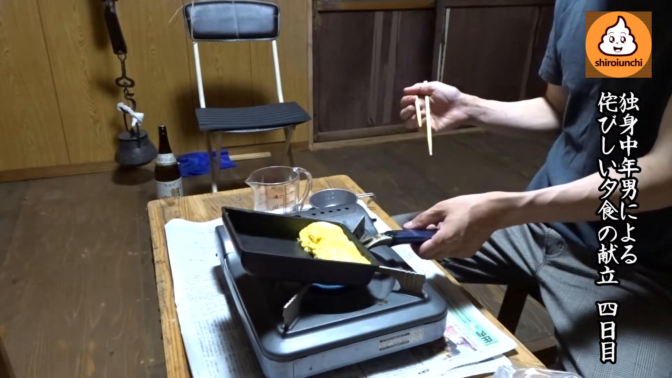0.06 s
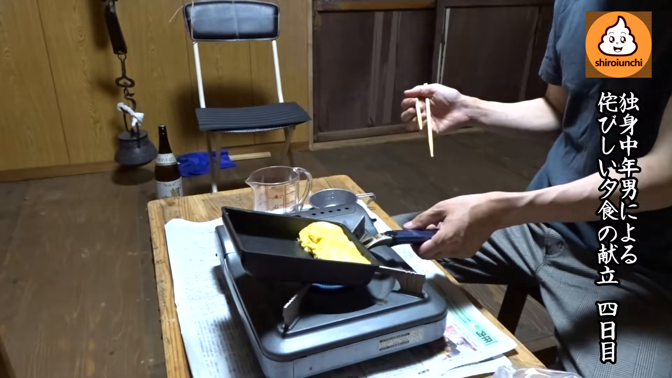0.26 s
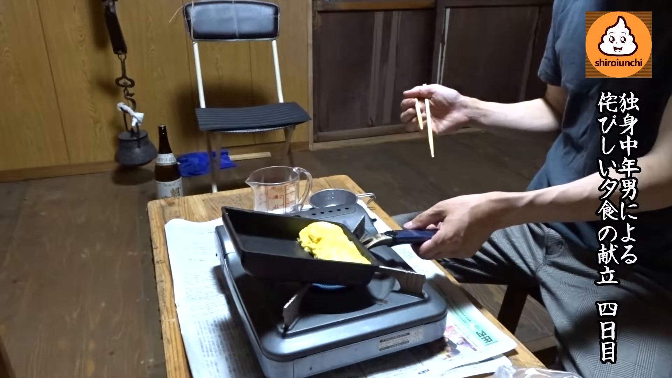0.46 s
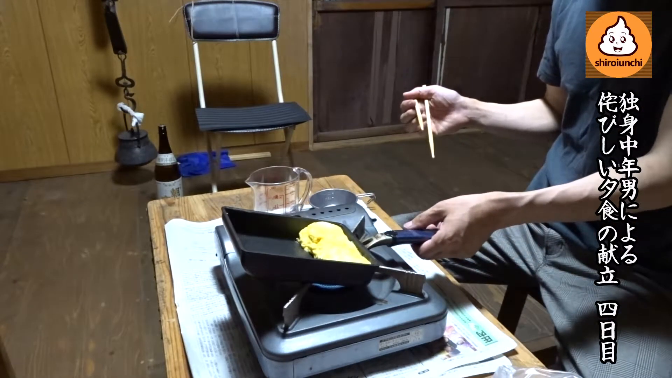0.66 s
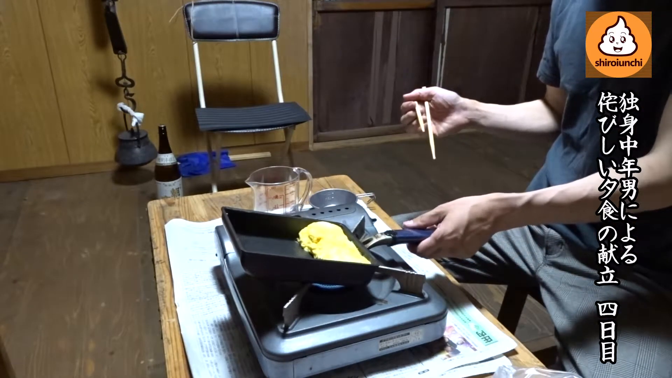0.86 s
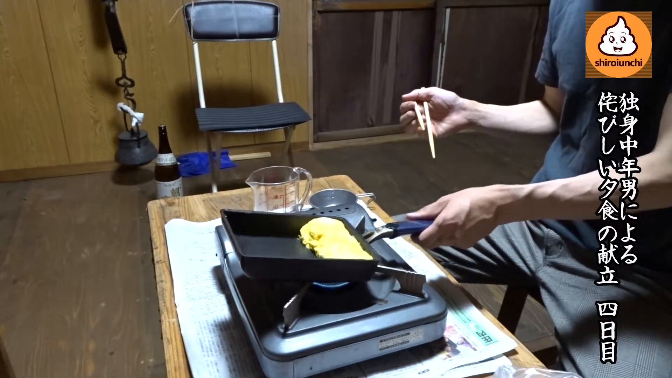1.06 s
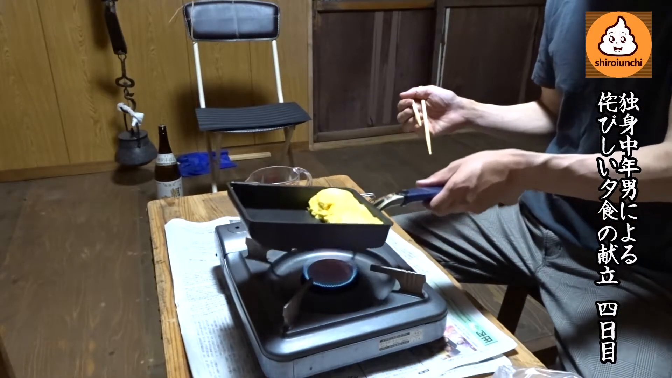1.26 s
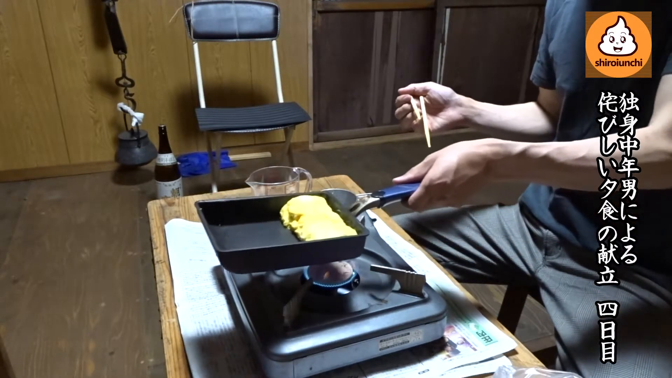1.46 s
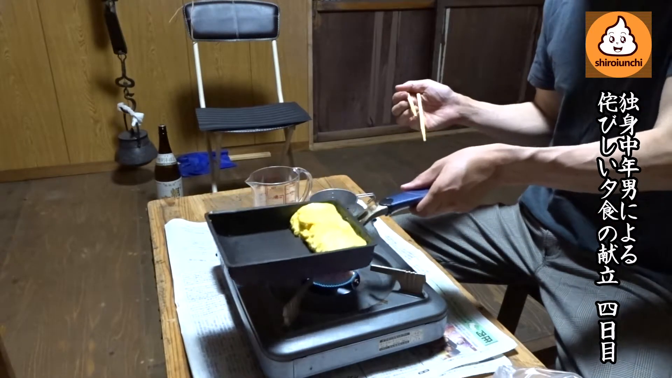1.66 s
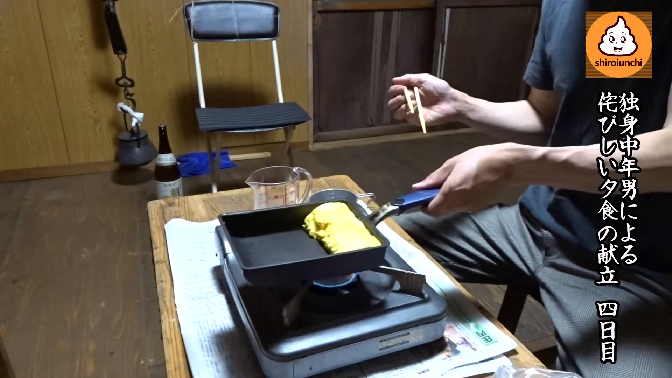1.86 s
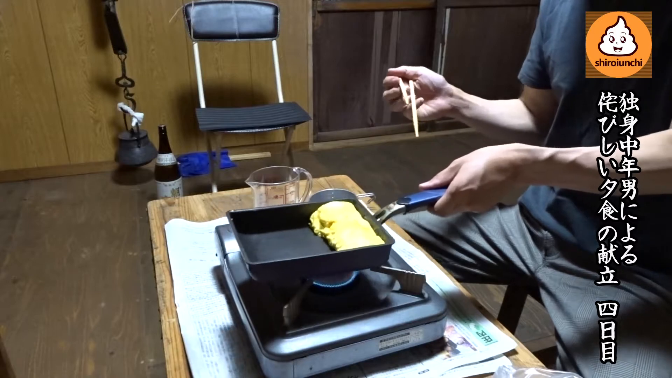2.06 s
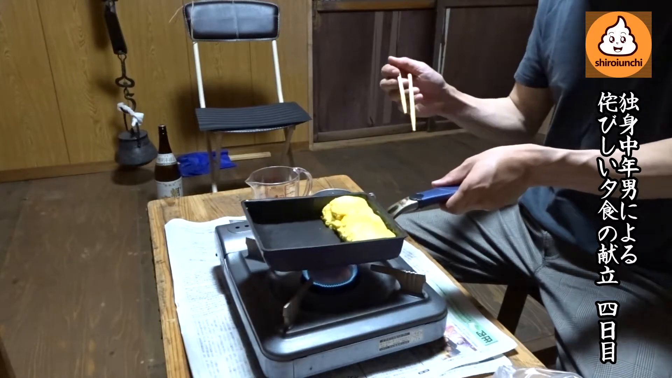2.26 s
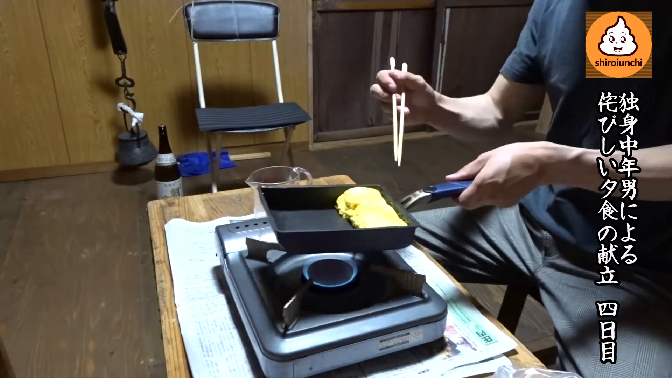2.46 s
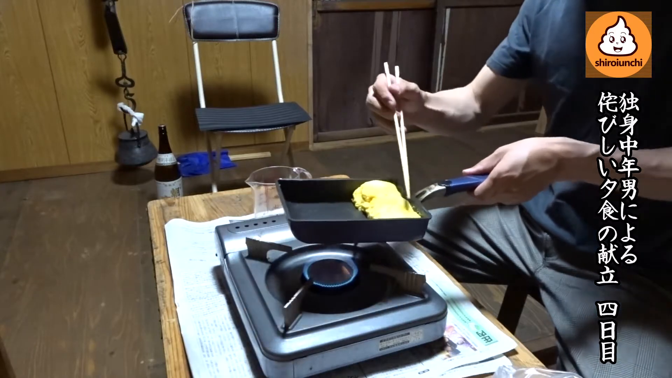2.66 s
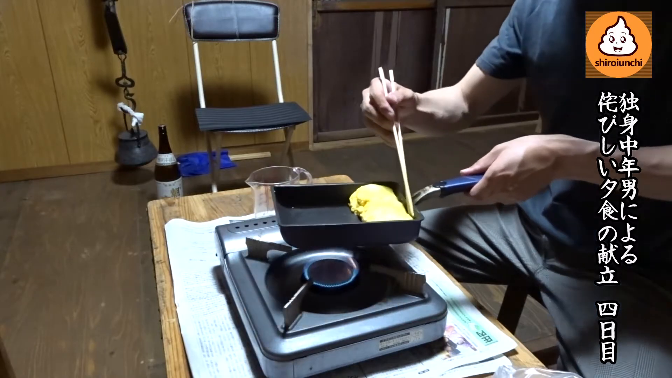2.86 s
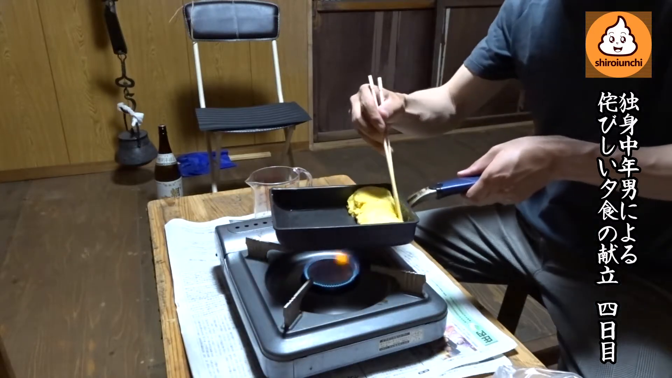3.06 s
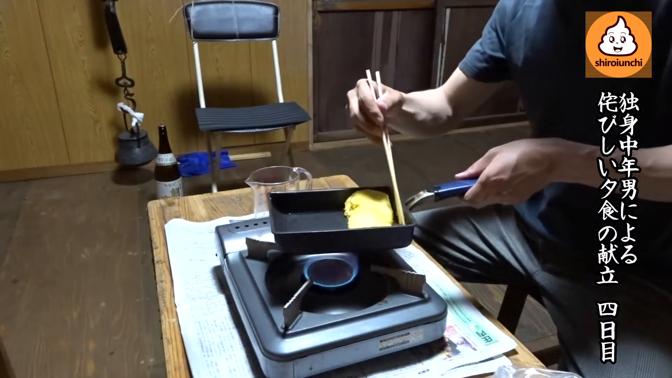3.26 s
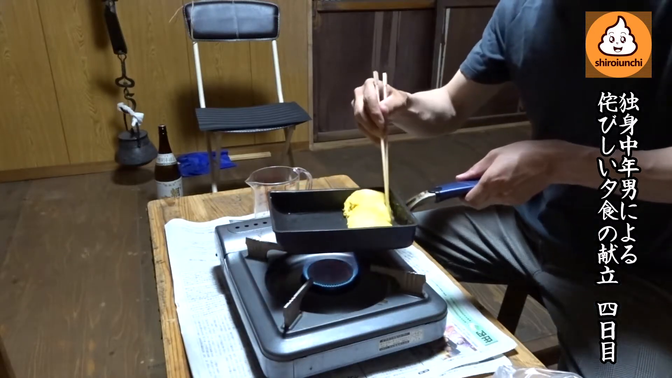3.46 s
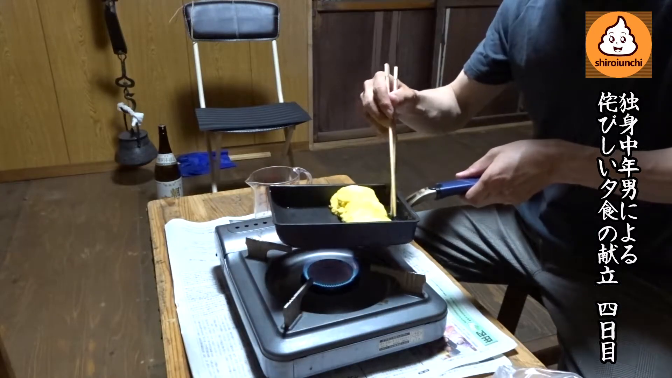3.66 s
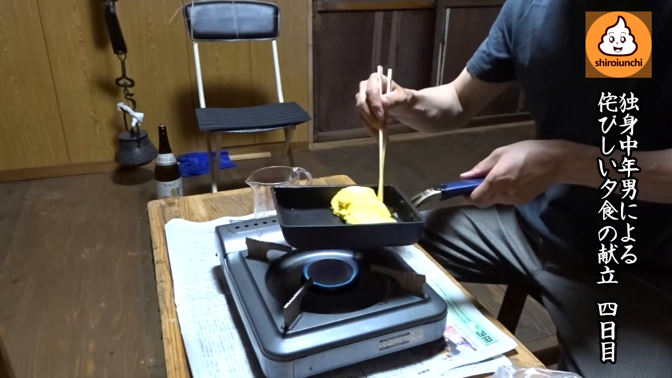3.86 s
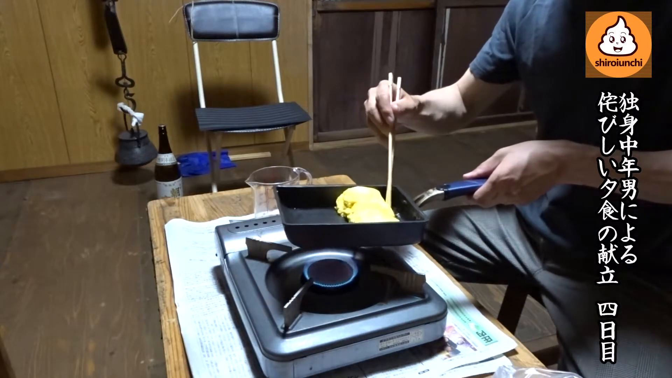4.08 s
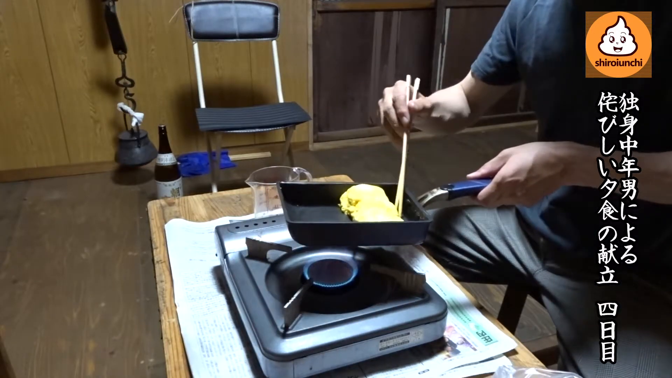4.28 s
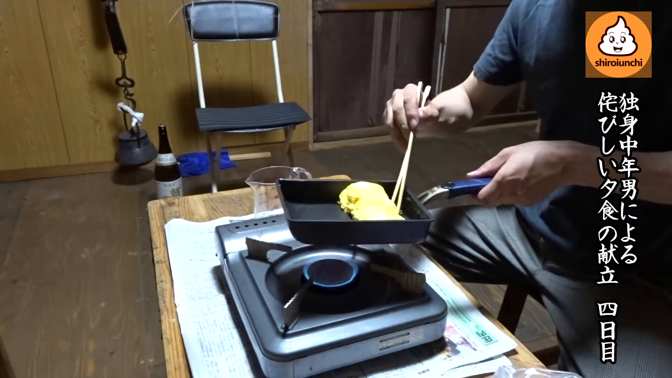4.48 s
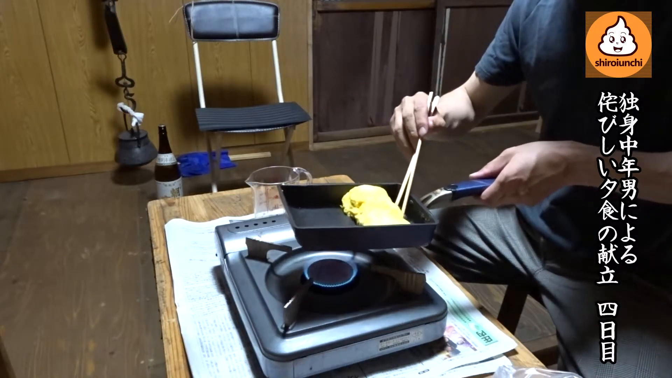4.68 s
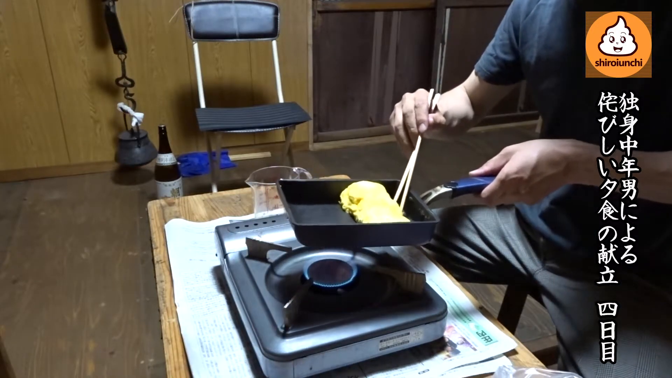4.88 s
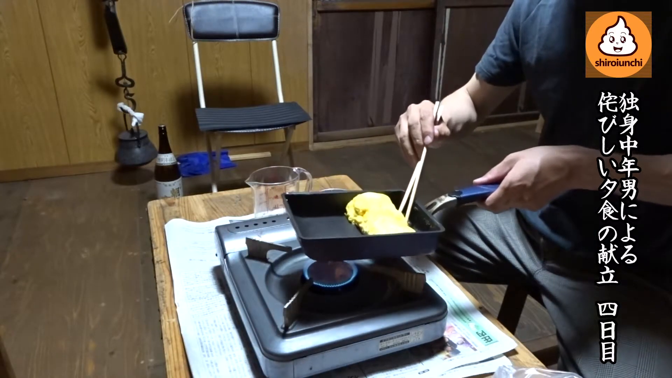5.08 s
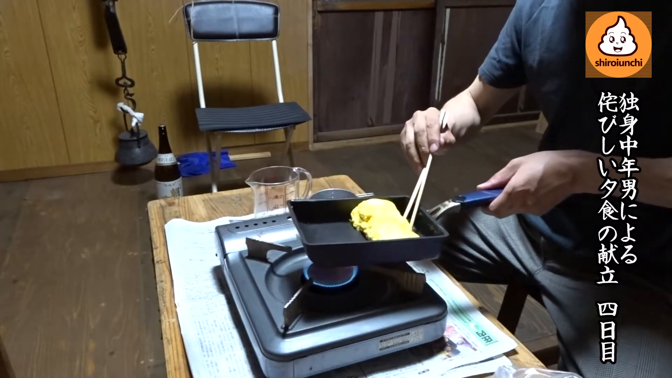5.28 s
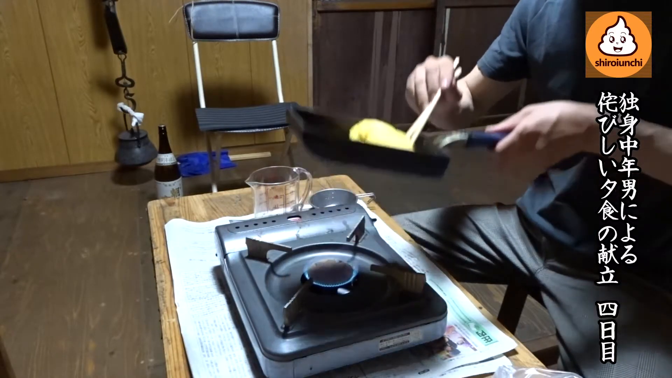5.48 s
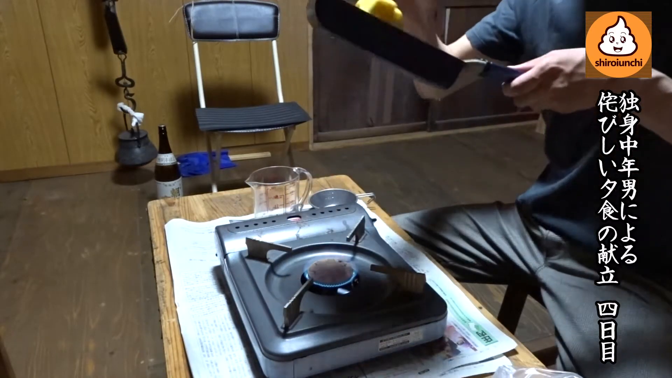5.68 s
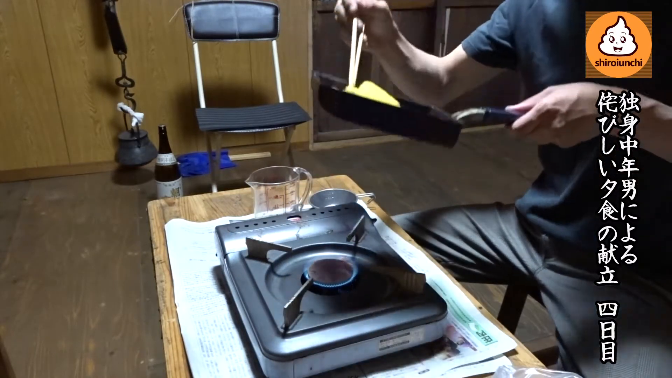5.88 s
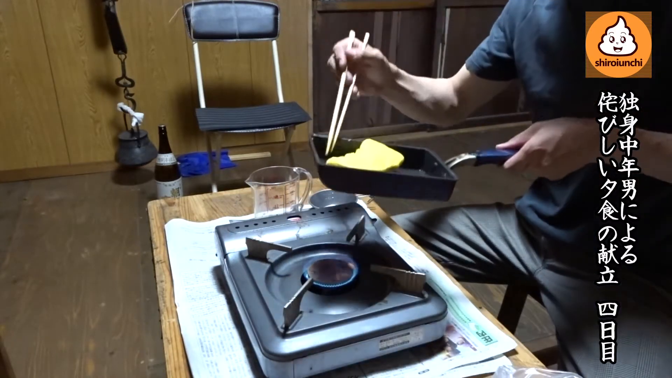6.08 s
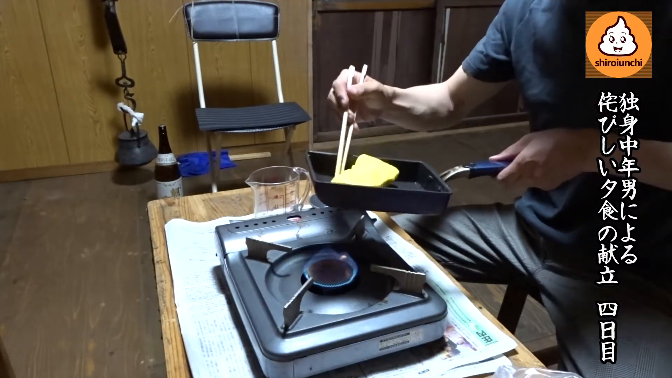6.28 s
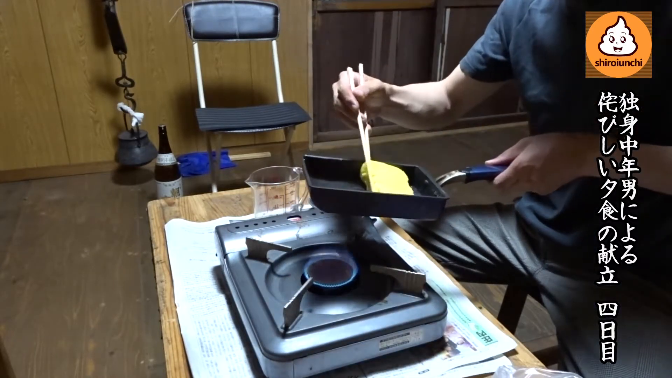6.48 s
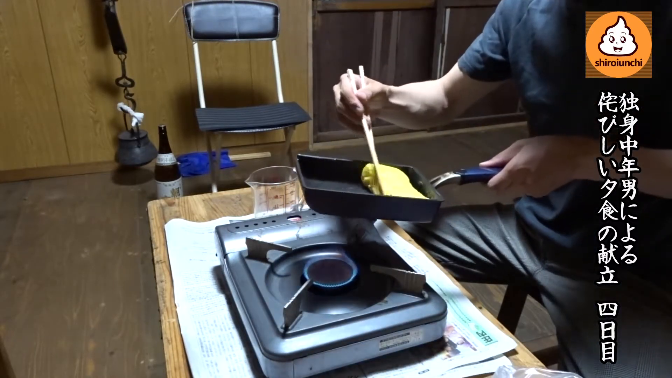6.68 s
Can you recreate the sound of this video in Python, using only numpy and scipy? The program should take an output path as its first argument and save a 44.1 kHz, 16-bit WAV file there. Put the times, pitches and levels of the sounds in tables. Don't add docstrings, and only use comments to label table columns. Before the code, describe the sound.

An omelette fries quietly in a square pan on a portable gas stove, with sparse spits. About a second in, the pan scrapes off its trivet with a hollow metallic ring. Frying then returns in uneven surges with wet pops and light chopstick taps, and near the end leaps into a loud, dense hiss with faint pan ringing. Close stereo, small wooden room.

```python
import sys
import numpy as np
from scipy import signal
from scipy.fft import rfft, irfft, next_fast_len
from scipy.io import wavfile
from scipy.ndimage import uniform_filter1d

SR = 44100
rng = np.random.default_rng(int(sys.argv[2]) if len(sys.argv) > 2 else 0)


def wav_record(signal):
    frames = np.transpose(np.atleast_2d(signal))
    bounded = np.clip(frames, -1, 1)
    quanta = np.round(bounded * 32767).astype(np.int16)
    wavfile.write(sys.argv[1], SR, quanta)


def undo_db(level):
    steps = np.asarray(level, float) / 20
    return 10 ** steps


N = 296793

# (time [s], vigour [dB], spray above coarse bubbles [dB])
FRY = [(0.0, -61, 8), (0.75, -64.5, 10), (1.42, -53.5, 4), (1.72, -50, 2), (2.16, -46.5, -1),
       (2.5, -52, -.7), (2.98, -54, 1), (3.15, -47, -4), (3.45, -44.5, -1.5), (3.77, -49.5, -1.5),
       (4.1, -46.5, -6), (4.64, -49.5, -4), (5.35, -50, -1), (5.5, -44.5, 2.5), (5.74, -42.5, 1.5),
       (5.82, -37, 1.5), (6.5, -36.5, -0.5), (6.73, -40.5, 1.5)]
# (start [s], vigour [dB], hold [s], spray above coarse bubbles [dB])
FLARES = [(0.01, -54.5, 0.016, 4), (0.267, -57.5, 0.018, 7), (0.455, -56, .02, 7),
          (0.622, -52.5, 0.019, 2.5), (1.471, -44, 0.11, -2.3), (1.756, -43.5, 0.14, -1.5),
          (2.044, -44, 0.037, -11), (2.214, -52, .04, 5.5), (2.623, -60, .05, 6), (2.862, -52, .02, -6),
          (3.098, -50.5, .03, 1), (3.466, -43.5, .12, -1.5), (3.802, -47.5, .06, -1),
          (4.185, -50, 0.018, -7), (4.376, -50.5, .03, -13), (4.917, -54, 0.026, 1), (5.236, -58, .03, 3),
          (5.442, -46.5, .02, -1), (5.613, -48, 0.026, 1), (5.928, -45, .03, 4), (6.093, -42.5, 0.026, 1),
          (6.296, -39.5, 0.035, -2)]


def vigour():
    rise_s, fall_db_per_s = 0.018, 72.5
    coarse_db, fineness_db = in_time(FRY)
    coarse, fine = undo_db(2 * coarse_db), undo_db(2 * (coarse_db + fineness_db))
    t = np.arange(N) / SR
    for start, db, hold, spray_db in FLARES:
        rise = np.clip((t - start) / rise_s, 0, 1) ** 2
        sinking_s = np.maximum(t - start - rise_s - hold, 0)
        flare = rise * undo_db(2 * (db - fall_db_per_s * sinking_s))
        coarse = coarse + flare
        fine = fine + flare * undo_db(2 * spray_db)
    return 10 * np.log10(coarse), 10 * np.log10(fine)


# (frequency [Hz], density [dB per Hz])
COARSE = [(300, -22), (700, -23), (1100, -5), (1600, -7), (2100, -1.5), (2700, 5), (3500, -3.5),
          (4600, -1.5), (6500, -9), (9000, -1)]
# (frequency [Hz], density [dB per Hz])
FINE = [(2500, -16), (4200, -4), (6000, -2), (8800, -5), (11000, 0.5), (14500, -14.5), (17000, -5)]


def frying():
    coarse_db, fine_db = vigour()
    t = np.arange(N) / SR
    fold_start_s, fold_end_s, fold_ease_s, fold_muffles_db = 2.95, 5.54, 0.64, 2
    folded = np.clip(np.minimum(t - fold_start_s, fold_end_s - t) / fold_ease_s, 0, 1)
    pace = undo_db(0.6 * (coarse_db + 49.5) + 2.5 * stretch(drift(25)))
    large = [rms_one(grains(2000 * pace, 1.56) / np.sqrt(pace)) for _ in range(2)]
    small = [rms_one(grains(5000 * pace, 2.6) / np.sqrt(pace)) for _ in range(2)]
    coarse = banded(large, COARSE, patchy_db=0.74, flicker_hz=26)
    coarse = undo_db(coarse_db - 1.15 - fold_muffles_db * folded) * coarse
    fine = undo_db(fine_db + 2.0) * banded(small, FINE, patchy_db=0.82, flicker_hz=14)
    return coarse + fine + spray(small, fine_db) + pan_and_pocket(large, coarse_db, folded)


# (frequency [Hz], width [Hz], level [dB])
SURGE = [(5520, 1900, 0)]
# (frequency [Hz], width [Hz], level [dB])
MIST = [(8860, 1800, 0)]


def spray(small, fine_db):
    jets_db = fine_db - 2.5 + np.minimum(2.9 * (fine_db + 37.0), 1.5)
    jets = undo_db(jets_db) * resonate(small[0], SURGE)
    mist_db = -58 + 0.29 * (fine_db + 52.5)
    mist = undo_db(mist_db) * resonate(resonate(small[1], MIST), MIST)
    return jets + mist


# (frequency [Hz], width [Hz], level [dB])
PAN = [(793, 6.8, -1), (1168, 43, -3), (1433, 96, -6.5), (1746, 150, -14.5), (2160, 110, -2),
       (2560, 42, -21.5), (3180, 33, -21)]
# (frequency [Hz], width [Hz], level [dB])
POCKET = [(2633, 410, -1.5), (4050, 140, -9.5)]


def pan_and_pocket(large, coarse_db, folded):
    pan_db = -60.5 + 0.71 * (coarse_db + 49) + 1.5 * stretch(drift(6.5))
    pocket_db = -56.5 + 0.88 * (coarse_db + 47) + 2.0 * stretch(drift(6.2))
    pocket_db += 6.5 * folded
    mid, side = undo_db(pan_db) * resonate(large[0], PAN) + undo_db(pocket_db) * resonate(large[1], POCKET)
    return spread(mid, side, 0.26)


# (time [s], peak [dB], pitch [Hz])
SPITS = [(0.015, -30, 3880), (0.0173, -28, 4390), (0.1871, -34, 7670), (0.2775, -23.5, 4050),
         (0.2808, -23, 8500), (0.459, -21.5, 3900), (0.4654, -25, 7670), (0.4733, -25, 8180),
         (0.5887, -26, 6290), (1.493, -16.5, 7450), (1.596, -15.5, 8600), (1.6838, -26, 8270),
         (1.766, -20, 8000), (1.782, -23, 5000), (1.8757, -14.5, 9000), (2.2234, -20.5, 6720),
         (2.798, -28, 4310), (3.411, -26, 4910), (3.59, -12, 7460), (3.599, -19, 7920),
         (3.6043, -13.5, 8900), (3.825, -25, 7060), (4.7018, -26, 6030), (4.7163, -24, 8700),
         (4.78, -25, 7140), (4.934, -23, 5680), (4.948, -20, 9400), (5.3239, -29, 6800),
         (5.351, -21.5, 8240)]
# (time [s], peak [dB], pitch [Hz])
BUBBLES = [(0.6402, -19.5, 3540), (1.0619, -33, 3170), (1.4441, -33, 3470), (1.4935, -26, 3500),
           (1.5962, -24, 3020), (1.8757, -25, 3100), (1.999, -24, 3190), (2.049, -26, 2670),
           (2.109, -18.5, 2200), (2.8632, -34, 3500), (2.8672, -27, 2980), (3.5839, -23, 3050),
           (3.661, -32, 2760), (3.788, -23.5, 3100), (3.795, -28, 2780), (3.891, -27, 2900),
           (3.95, -27, 3600), (3.9645, -21, 2740), (4.0136, -21, 2880), (4.0596, -36, 3060),
           (4.194, -19.5, 2760), (4.215, -27, 2560), (4.341, -29, 3560), (4.385, -27, 2640),
           (4.6285, -30, 3960), (4.9643, -28, 2650), (5.1421, -22.5, 3120), (5.4363, -20.5, 2900),
           (5.653, -22, 2760)]


def pops():
    spit_damping, bubble_damping = 0.66, 0.53
    length = 900
    out, t = np.zeros((2, N + length)), np.arange(length) / SR
    lag = round(0.00077 * SR)
    bursts = [(*row, spit_damping * row[2]) for row in SPITS]
    bursts += [(*row, bubble_damping * row[2]) for row in BUBBLES]
    for s, db, hz, width_hz in bursts:
        swell = 2.86 * width_hz * t
        envelope = np.e * swell * np.exp(-swell)
        burst = undo_db(db - 3.0) * envelope * np.sin(2 * np.pi * (hz * t + rng.random()))
        burst[lag:] -= 0.74 * min(hz / 8000, 1) ** 2 * burst[:-lag].copy()
        band = signal.butter(1, [max(hz - width_hz / 2, 500), hz + width_hz / 2], "band", fs=SR)
        noise = rms_one(signal.lfilter(*band, rng.standard_normal((2, length))))
        spatter = undo_db(db - 20) * np.exp(-t / 0.0037) * noise
        out[:, round(s * SR):][:, :length] += burst + spatter
    return out[:, :N]


# (start [s], end [s], frequency [Hz], width [Hz], level [dB])
SINGING = [
    (5.68, 5.77, 1180, 25, -58),
    (5.78, 5.97, 1175, 13, -48),
    (5.72, 7.4, 2140, 31, -54.5),
    (5.9, 6.34, 3200, 50, -44.5),
    (6.05, 6.62, 2150, 50, -53),
    (6.2, 6.55, 1360, 140, -51),
    (6.55, 6.73, 800, 20, -60),
    (5.79, 5.84, 3900, 1500, -42),
    (5.55, 5.72, 940, 320, -53.5),
    (6.197, 6.245, 1340, 140, -42),
]


def singing():
    out, t = np.zeros(N), np.arange(N) / SR
    for start, end, hz, width_hz, db in SINGING:
        fade = np.clip(np.minimum(t - start, end - t) / 0.0077, 0, 1)
        part = slice(round(start * SR), round(end * SR))
        tone = resonate(rng.standard_normal(len(t[part])), [(hz, width_hz, 0)])
        tone = tone / (uniform_filter1d(tone ** 2, size=900) ** 0.36 + 0.05)
        out[part] += undo_db(db) * fade[part] * rms_one(tone)
    return out


# (time [s], peak [dB], brightness [dB per octave])
TAPS = [
    (2.861, -21.5, 2),
    (3.407, -24.5, 6.5),
    (3.789, -23.5, -0.5),
    (5.814, -18, 9),
    (6.206, -23, -1),
]
# (frequency [Hz], level [dB], decay time T60 [s])
TAP_MODES = [(777, -10.5, 0.13), (1140, -12, 0.083), (1340, -12, 0.078), (2200, -8, .06),
             (3210, -1.5, 0.041), (3630, -3.5, 0.034), (4630, -7, .03)]


def taps():
    s, db, bright_db = np.transpose(TAPS)
    out = np.zeros(N)
    for hz, mode_db, t60 in TAP_MODES:
        clicks = np.zeros(N)
        at = np.round(s * SR).astype(int)
        clicks[at] = undo_db(db - 16.0 + mode_db + bright_db * np.log2(hz / 2000))
        out += ring(clicks, hz, t60)
    return signal.sosfilt(signal.butter(2, 600, "high", fs=SR, output="sos"), out)


# (time [s], weight on the stove [dB], sliding [dB])
DRAG = [
    (1.065, -70, -54),
    (1.082, -57, -61),
    (1.095, -30.5, -49.5),
    (1.16, -31.5, -34.5),
    (1.192, -29.5, -30.5),
    (1.215, -29, -39),
    (1.255, -33.5, -41.5),
    (1.34, -48, -54),
    (1.5, -64, -68),
]
# (frequency [Hz], level [dB], decay time T60 [s])
STOVE = [(87.7, -6.5, 0.92), (165, -18, 0.19), (203, -9.5, .25), (230.7, -10, 0.51), (298, -8.5, .3),
         (365, -12, 0.31), (483, -14, 0.68), (558.5, 1.5, 0.44), (607, -14.5, 0.29), (663, -9, 0.52),
         (800, -6.5, 0.14), (961, -9.5, 0.13), (1086, -17, .3), (1160, -15, 0.2), (1420, -20.5, 0.24),
         (1420, -18, 0.49), (1500, -32, .3)]
# (frequency [Hz], width [Hz], level [dB])
GRIT = [(2080, 51, -8), (2800, 330, -6.5), (3130, 150, -4.5), (3310, 130, -2.5), (4100, 1400, -13),
        (7000, 3700, -19.5)]


def drag():
    part = slice(round(DRAG[0][0] * SR), round(DRAG[-1][0] * SR))
    body_db, grit_db = [column[part] for column in in_time(DRAG)]
    trivet_db = 6.0 + body_db + 0.3 * (grit_db - body_db)
    plate_db = -35.5 + 0.82 * (body_db + 33)
    count, lead = len(body_db), SR // 4
    knocks = rms_one(grains(5000, 1.3, count=count + lead)[0])
    groups = np.zeros((3, count))
    for hz, db, t60 in STOVE:
        mode = ring(knocks, hz, 0.81 * t60)
        mode /= uniform_filter1d(mode ** 2, size=1500) ** 0.58 + 1e-9
        groups[np.searchsorted([420, 640], hz)] += undo_db(db) * rms_one(mode[lead:])
    rattle_band = signal.butter(3, [250, 1800], "band", fs=SR, output="sos")
    rattle = rms_one(signal.sosfilt(rattle_band, knocks[lead:]))
    grit = resonate(grains(2700, 1.4, count=count)[0], GRIT)
    out = np.zeros(N)
    for db, group in zip((body_db, trivet_db, plate_db), groups):
        out[part] += undo_db(db - 2.5) * rms_one(group)
    out[part] += undo_db(plate_db - 7.0) * rattle + undo_db(grit_db - 0.5) * grit
    return signal.sosfilt(signal.butter(4, 62, "high", fs=SR, output="sos"), out + catch())


def catch():
    blow_s, blow_db, skip_s, skip_loss_db = 1.0935, -22.5, 0.0045, 5
    click = np.zeros(N)
    for k in range(2):
        s = blow_s + skip_s * k * rng.uniform(0.8, 1.2)
        click[round(s * SR)] = undo_db(blow_db - skip_loss_db * k)
    click = signal.sosfilt(signal.butter(2, 3900, fs=SR, output="sos"), click)
    out = ring(click, 3200, 0.017) + 0.3 * ring(click, 3100, 0.0094)
    return out + 0.6 * ring(click, 1340, 0.018) + 0.74 * ring(click, 2350, 0.012)


# (frequency [Hz], density [dB per Hz])
FLAME = [(25, -20), (60, -5.5), (130, -6.5), (300, -2), (560, -4), (1100, -6), (2000, -1), (3200, -0.5),
         (5500, -7), (8800, -3.5), (11500, -9.5), (16500, -19)]


def flame():
    turbulence = rng.standard_normal((2, 2, N))
    return undo_db(-48.5) * banded(turbulence, FLAME, patchy_db=0.68, flicker_hz=7.7)


# (time [s], level [dB])
FLUTTER = [(0.0, -58.5), (1.1, -65), (1.55, -53.5), (2.05, -51), (2.75, -60), (3.48, -53), (5.1, -63.5),
           (5.5, -56.5), (6.73, -61)]


def flutter():
    band = signal.butter(2, [170, 800], "band", fs=SR, output="sos")
    stirred = rms_one(signal.sosfilt(band, rng.standard_normal((2, N))))
    mid, side = undo_db(in_time(FLUTTER)[0] - 5.5) * stirred
    return spread(mid, side, 0.21)


def room(x):
    hz = np.arange(SR // 2 + 1.)
    t60 = 0.29 / (1 + hz / 7000)
    thin_bass = hz ** 2 / (hz ** 2 + 450 ** 2)
    combs = np.zeros((2, len(hz)), complex)
    for k, lag in enumerate(np.round(rng.uniform(0.004, 0.033, 16) * SR) / SR):
        loop = undo_db(-60 * lag / t60) * np.exp(-2j * np.pi * hz * lag)
        combs[k % 2] += (-1) ** (k // 2) * loop / (1 - loop) * thin_bass
    echoes = irfft(combs, SR)[:, :SR // 2]
    return signal.fftconvolve(x[None], echoes)[:, :N]


# (frequency [Hz], correlation [-1 to 1])
LIKENESS = [(60, 1), (130, 0.85), (290, 0.72), (640, 0.25), (1410, 0.79), (3100, 0.93), (6820, 0.14),
            (15000, 0.21)]
# (frequency [Hz], left minus right [dB])
LEAN = [(60, 0), (240, -0.5), (950, -1), (3770, -1.0), (15000, -2.5)]


def banded(sources, spectrum, patchy_db, flicker_hz):
    out, together = 0, drift(flicker_hz)
    edges = 25 * 2 ** np.arange(0, 9.7, 0.4)
    for k, (low, high) in enumerate(zip(edges, edges[1:])):
        hz = np.sqrt(low * high)
        if not spectrum[0][0] < hz < spectrum[-1][0]:
            continue
        band = signal.butter(2, [low, high], "band", fs=SR, output="sos")
        mid, side = signal.sosfilt(band, sources[k % 2])
        alike = np.clip(at_hz(LIKENESS, hz), -1, 1)
        flicker_db = patchy_db * (0.44 * together + drift(flicker_hz))
        gain = stretch(undo_db(at_hz(spectrum, hz) + flicker_db))
        lean = undo_db(at_hz(LEAN, hz) / 2 * np.array([[1], [-1]]))
        out = out + gain * lean * spread(np.sqrt(1 + alike) * mid, np.sqrt(1 - alike) * side, 1)
    return rms_one(out)


def grains(per_s, spread_db, count=N):
    born = rng.random(count) < per_s / SR
    size = undo_db(spread_db * np.minimum(rng.exponential(1, count), 4))
    return size * born * rng.standard_normal((2, count))


def resonate(x, peaks):
    out = 0
    for k, (hz, width_hz, db) in enumerate(peaks):
        r = np.exp(-np.pi * width_hz / SR)
        zeros = [(1 - r * r) / 2, 0, (r * r - 1) / 2]
        poles = [1, -2 * r * np.cos(2 * np.pi * hz / SR), r * r]
        out = out + (-1) ** k * undo_db(db) * signal.lfilter(zeros, poles, x)
    return rms_one(out)


def ring(clicks, hz, t60):
    r, w = undo_db(-60 / (t60 * SR)), 2 * np.pi * hz / SR
    return signal.lfilter([0, np.sin(w)], [1, -2 * r * np.cos(w), r * r], clicks + 1e-18)


def drift(rate):
    r = np.exp(-80 * np.pi * rate / SR)
    noise = rng.standard_normal(N // 40 + 2002)
    return rms_one(signal.lfilter([1], [1, -2 * r, r * r], noise)[2000:])


def stretch(slow):
    return np.interp(np.arange(N) / 40, np.arange(len(slow)), slow)


def spread(mid, side, width):
    return mid + width * side * [[1], [-1]]


def rms_one(x):
    return x / np.sqrt(np.mean(x ** 2) + 1e-20)


def in_time(rows):
    s, *columns = np.transpose(rows)
    return [np.interp(np.arange(N) / SR, s, column) for column in columns]


def at_hz(points, hz):
    point_hz, value = np.transpose(points)
    return np.interp(np.log(hz), np.log(point_hz), value)


def scene():
    spot = pops() + taps() + singing()
    scraped = drag()
    near = spot * undo_db(np.array([[-0.4], [0.4]])) + scraped + flutter()
    return frying() + near + flame() + room(undo_db(-16) * spot[0] + undo_db(-23) * scraped)


def low_pass(x):
    return signal.sosfilt(signal.butter(12, 16370, fs=SR, output="sos"), x)


def record(dry):
    top_hz, loud_top_hz, opens_db = 15050, 15830, -47
    size = next_fast_len(N)
    hz, tones = np.arange(size // 2 + 1) * SR / size, rfft(dry, size)
    body = irfft(tones * (hz < top_hz), size)[:, :N]
    top = irfft(tones * (hz >= top_hz) * (hz < loud_top_hz), size)[:, :N]
    air = irfft(tones[0] * (hz > 11000) * (hz < top_hz), size)[:N]
    loud = uniform_filter1d(air ** 2, size=700) > undo_db(opens_db) ** 2
    mix = body + top * uniform_filter1d(loud * 1., size=1024)
    return low_pass(mix)


dry = scene()
out = record(dry)
wav_record(out)
```